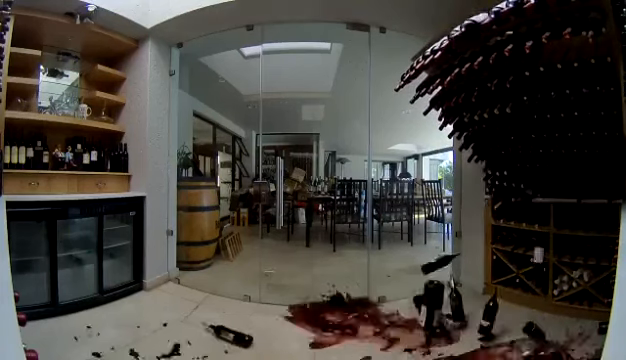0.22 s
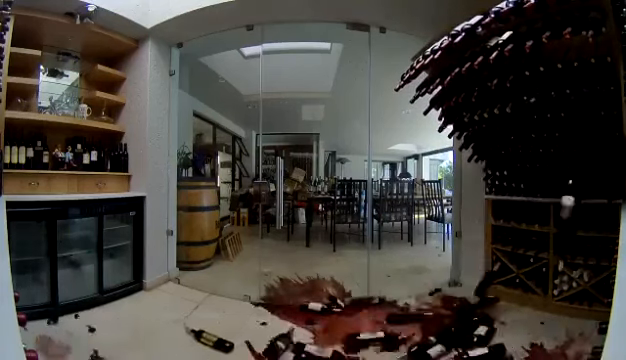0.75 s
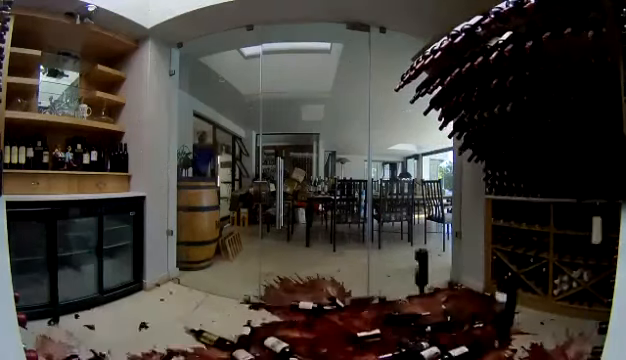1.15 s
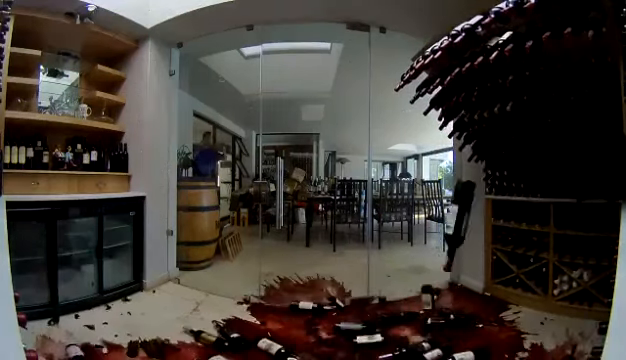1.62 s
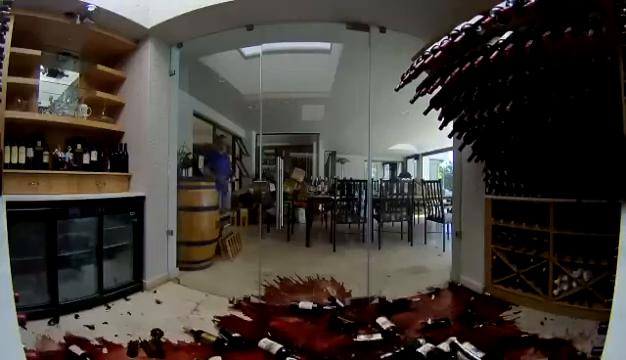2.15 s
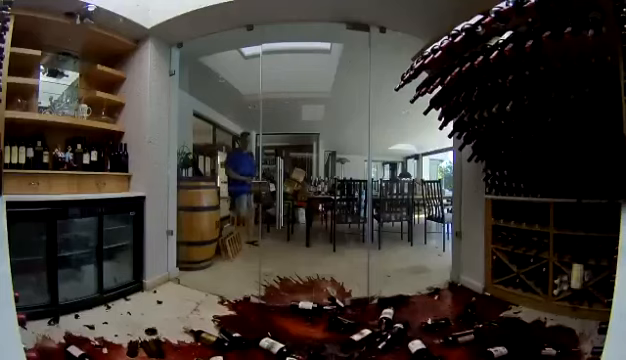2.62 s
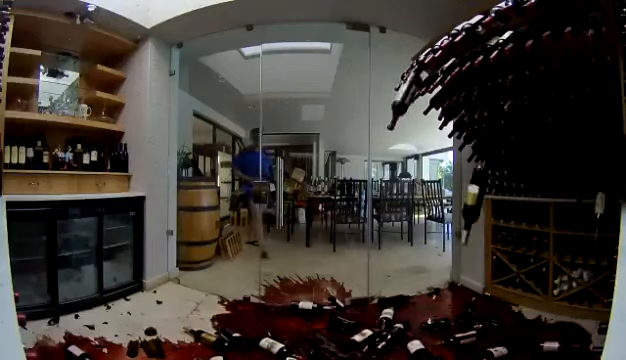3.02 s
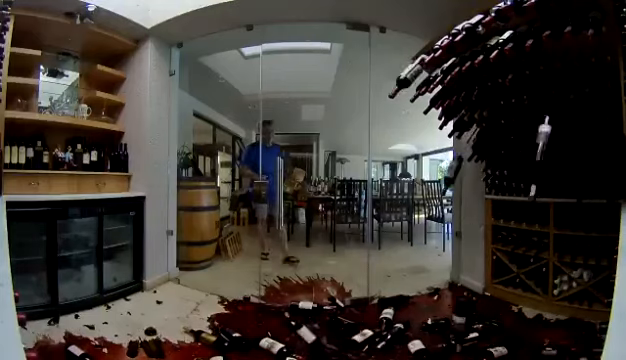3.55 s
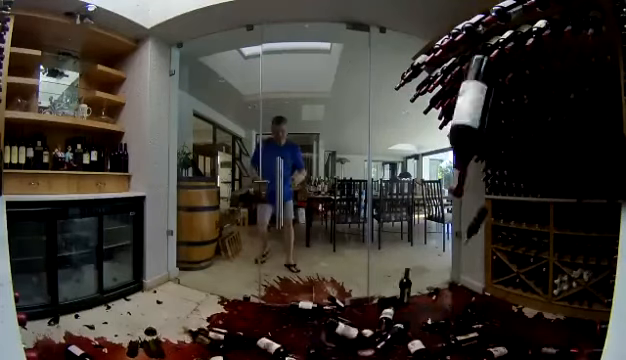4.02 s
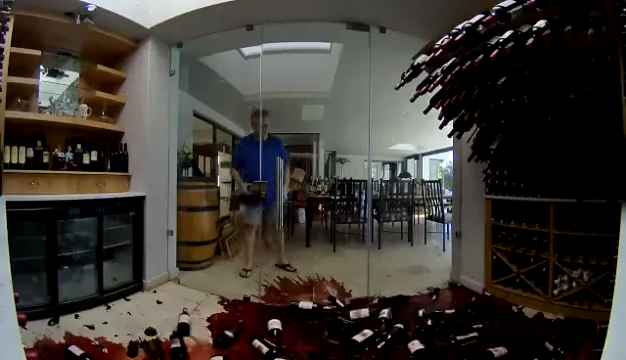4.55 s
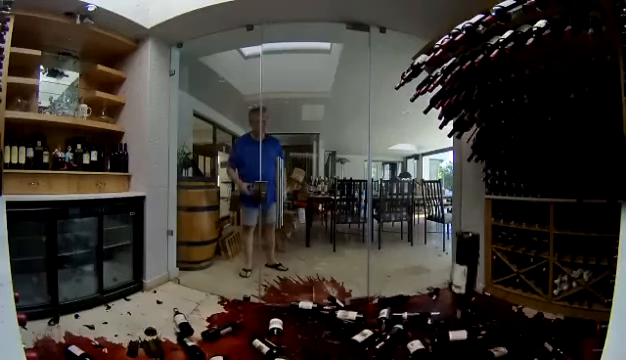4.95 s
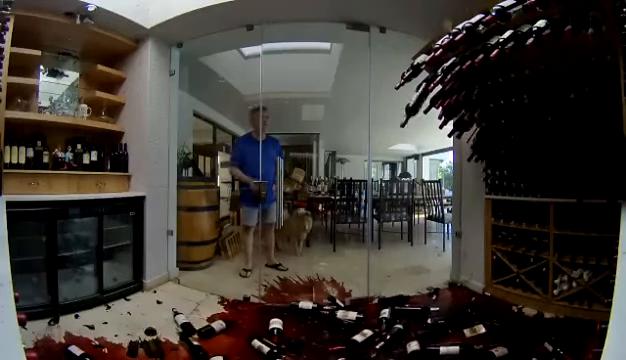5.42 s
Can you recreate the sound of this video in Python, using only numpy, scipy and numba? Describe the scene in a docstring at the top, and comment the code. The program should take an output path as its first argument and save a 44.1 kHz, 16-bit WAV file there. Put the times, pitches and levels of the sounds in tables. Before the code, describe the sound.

A hard-walled wine cellar with glass doors: full bottles fall from a rack and burst on the tile floor. Two big smashes open, a short lull follows, then overlapping bursts crash almost without pause, with wine slaps, ringing shards and faint floor thuds. Near the end the crash drops away and bright pieces rattle. Heard through one small microphone, mono, bright but cut off at the top.

```python
"""Wine bottles bursting in a cellar

Full wine bottles drop from a rack and burst on a tiled floor, one upon another, in a hard-walled cellar.
Wine, glass walls, shards and splinters are crowds of tiny struck modes with short echoes, the smaller the higher.
Larger pieces rattle as noise contacts in one resonance; filtered noise makes the floor's thuds and rumble.
A small microphone rounds the loudest peaks; a steep low-pass near 7 kHz ends the treble.
"""
import sys
import numpy as np
from scipy import signal
from scipy.fft import rfft, irfft
from scipy.io import wavfile
from numba import njit

SR = 44100
rng = np.random.default_rng(int(sys.argv[2]) if len(sys.argv) > 2 else 0)


def transcribe(signal):
    """Save signal, clipped to [-1, 1], as a 16-bit WAV file at the path in sys.argv[1]."""
    frames = np.atleast_2d(signal).T
    limited = np.clip(frames, -1, 1)
    pcm = np.round(limited * 32767).astype(np.int16)
    wavfile.write(sys.argv[1], SR, pcm)


N = 250488
T = np.arange(N) / SR  # time in seconds

# Bottles, or clusters of them, that burst on the tiles.
# Each row: start in seconds, level of the glass walls in dB, level of the wine in dB, hold in seconds.
BOTTLE_BURSTS = [(-0.02, -22, -33.5, 0.2), (0.184, -21.5, -30, .18), (0.692, -31, -36.5, .1),
                 (0.987, -29.5, -31.5, 0.068), (1.111, -26.5, -32, 0.066), (1.286, -24.5, -30, 0.14),
                 (1.532, -26, -29, 0.025), (1.596, -27, -36, 0.017), (1.673, -26.5, -30.5, 0.046),
                 (1.781, -27, -28.5, 0.056), (1.854, -26.5, -29, 0.051), (2.179, -22, -30, 0.14),
                 (2.389, -24.5, -32.5, 0.032), (2.515, -22, -37.5, 0.088), (2.804, -23.5, -28, 0.026),
                 (3.112, -22, -30, 0.023), (3.165, -24, -27, 0.028), (3.274, -24.5, -31.5, 0.075),
                 (3.434, -30, -35, .08), (3.621, -26.5, -34, .13), (3.845, -24.5, -29, 0.014),
                 (3.885, -26, -30.5, .03), (3.954, -27, -31, 0.027), (4.046, -22.5, -34, 0.042),
                 (4.124, -26, -33, 0.073), (4.275, -25, -31, .04), (4.398, -28, -36, 0.073),
                 (4.577, -28.5, -32, 0.024), (4.63, -27.5, -33.5, .05), (4.75, -31.5, -35.5, 0.043),
                 (4.942, -24, -30.5, 0.035), (5.164, -25.5, -32.5, 0.054), (5.571, -35, -47, 0.068)]


def undb(db):
    """Turns decibels into an amplitude factor."""
    return 10 ** (np.asarray(db) / 20)


def unit(x):
    """Scales a sound to an RMS of one."""
    return x / np.sqrt(np.mean(x ** 2))


def band(x, lo_hz, hi_hz):
    """Colours a sound as glass on tile and keeps one range of it, with soft edges."""
    # Glass on tile through the small microphone. Each row: frequency in Hz, level in dB per Hz.
    colour = [(65, -43.5), (110, -25), (150, -22.5), (329, -18), (399, -14.5), (458, -13.5), (500, -12.5),
              (1450, -12.5), (2710, -7), (3390, -9), (4720, -8), (5530, -2), (6460, 7), (7050, -1),
              (9160, -25), (15500, -120)]
    f = np.maximum(np.fft.rfftfreq(N, 1 / SR), 1)
    hz, db = np.transpose(colour)
    tilt = undb(np.interp(np.log(f), np.log(hz), db))
    edges = 1 / np.sqrt((1 + (lo_hz / f) ** 20) * (1 + (f / hi_hz) ** 20))
    return unit(irfft(rfft(x) * edges * tilt, N))


@njit
def ring(n, start, pole, size):
    """Each grain is one struck mode: a turning, shrinking phasor followed down to a thirtieth of its size."""
    y = np.zeros(n)
    for k in range(len(start)):
        z = size[k] + 0j
        i = start[k]
        while i < n and abs(z) > size[k] / 30:
            y[i] += z.imag
            z = z * pole[k]
            i = i + 1
    return y


def grains(per_s, lo_hz, hi_hz, t60_s, scatter_db, echoes=4):
    """Fragments struck at random moments, each with its own pitch, ring time, size and echoes."""
    cellar_t60_s, echo_db = .1, -1.5
    draws = rng.random((int(per_s * N / SR), 4 + echoes))
    when, pitch, long, big, *lags = draws.T
    hz = lo_hz + (hi_hz - lo_hz) * pitch
    ring_s = t60_s * 2 ** (2 * long - 1)  # from half to double the given time
    pole = np.exp(2j * np.pi * hz / SR - np.log(1000) / (ring_s * SR))
    # a long ring starts weaker, so the blow's energy sets the size
    size = undb(scatter_db * big ** 3) / np.sqrt(ring_s)
    # every fragment lies elsewhere, so tile, glass and plaster return it after lags of its own
    lag_s = np.array([0 * when] + lags) * cellar_t60_s / 3  # the first row is the direct sound
    gain = undb((lag_s > 0) * echo_db - 60 * lag_s / cellar_t60_s)
    start = (when * N + lag_s * SR).astype(np.int64)
    return ring(N, start.ravel(), np.tile(pole, echoes + 1), (gain * size).ravel())


def bursts(db, fade_db_per_s):
    """Power of all bursts: each rises quickly, holds and dies away."""
    step, attack_s = 64, 0.02  # step in samples
    t = T[::step]
    start, _, _, hold = np.array(BOTTLE_BURSTS).T[:, :, None]
    rise = np.clip((t - start) / attack_s, 0, 1)
    fade_db = fade_db_per_s * np.maximum(t - start - hold, 0)
    level = rise * undb(db[:, None] - fade_db)
    return np.interp(T, t, np.sum(level ** 2, axis=0))


def over_bed(burst_power, bed_db):
    """Adds the power of the bursts to that of the steady noise under them and gives the level in dB."""
    return 10 * np.log10(burst_power + undb(bed_db) ** 2)


def wine(wine_db):
    """Wine slaps the tiles: a crowd of very short, low modes."""
    slaps = grains(1500, 170.0, 873.0, .012, 2.8)
    return undb(wine_db) * band(slaps, 220., 698.0)


def glass(per_s, lo_hz, hi_hz, tick_t60_s, tinkle_per_s, tinkle_t60_s, tinkle_db):
    """A dense patter of short ticks under fewer fragments that ring on."""
    ticks = unit(grains(per_s, 0.803 * lo_hz, 1.1 * hi_hz, tick_t60_s, 6.7))
    tinkle = unit(grains(tinkle_per_s, .8 * lo_hz, 1.1 * hi_hz, tinkle_t60_s, 6., echoes=2))
    return band(ticks + undb(tinkle_db) * tinkle, lo_hz, hi_hz)


def walls(wall_db):
    """Bottle walls crack: the largest fragments, ringing lowest."""
    return undb(wall_db) * glass(2500, 695.0, 2310.0, 0.0079, 200, 0.32, -7.0)


def shards(shard_db):
    """Shards ring above the walls, with more tinkle."""
    return undb(shard_db) * glass(3000, 2480.0, 5160.0, .008, 250, 0.4, -4.0)


def splinters():
    """The finest splinters ring highest, at a level that follows its own course."""
    # How loud the splinters are. Each row: time in seconds, level in dB.
    splinter_levels = [(0.0, -11.5), (0.32, -14.5), (0.52, -25), (1.17, -13.5), (1.47, -17), (1.6, -14.5),
                       (2.53, -17.5), (2.59, -13), (2.86, -15), (3.08, -13), (3.27, -20.5), (3.35, -15),
                       (3.64, -20), (3.73, -12), (3.75, -16.5), (5.13, -18), (5.21, -14.5), (5.3, -21),
                       (5.44, -22.5), (5.46, -20.5), (5.54, -20), (5.55, -26), (5.66, -21.5), (5.68, -29)]
    splinter_db = np.interp(T, *np.transpose(splinter_levels))
    return undb(splinter_db) * glass(3000, 4850.0, 7580.0, .008, 250, 0.43, -3.0)


def boom(wine_db):
    """The floor booms with low struck modes whose level moves with the wine."""
    mean_db = -52.
    boom_db = mean_db + wine_db - wine_db.mean()
    return undb(boom_db) * band(grains(600, 90., 300., 0.023, 5.6), 134., 220.)


def rumble(wall_db):
    """Low-passed noise at the very bottom, swelling gently with the cracking walls."""
    top_hz, base_db, share = 66., -53.5, .3  # share of the walls' swing in dB
    low = signal.cheby1(6, 1, top_hz, fs=SR, output="sos")
    noise = unit(signal.sosfilt(low, rng.standard_normal(N)))
    swing_db = share * (wall_db - wall_db.mean())
    return undb(base_db + swing_db) * noise


def crash():
    """Wine and glass burst over a steady noise of both; the smaller the fragment, the higher it rings."""
    # Level of the steady glass noise under the bursts, with an early dip and slow return.
    # Each row: time in seconds, level in dB.
    bed_levels = [(0, -19), (.4, -31), (.56, -31), (.95, -26), (1.3, -24.5), (2.1, -25), (2.7, -25),
                  (2.8, -27), (2.95, -28.5), (3.08, -31), (3.3, -27), (3.57, -29.5), (3.75, -25),
                  (4.5, -26.5), (4.85, -30.5), (5.1, -26), (5.3, -26.5), (5.5, -44), (5.68, -37.5)]
    bed_db = np.interp(T, *np.transpose(bed_levels))
    _, glass_db, slap_db, _ = np.transpose(BOTTLE_BURSTS)
    wine_fade, wall_fade, shard_fade = 170, 128.5, 98  # dB per second
    # shards, and the wine's steady noise, stand in dB against the walls; wine bursts have their own levels
    wine_db = over_bed(bursts(slap_db, wine_fade), bed_db - 10.5)
    wall_db = over_bed(bursts(glass_db, wall_fade), bed_db)
    shard_db = over_bed(bursts(glass_db + 2, shard_fade), bed_db + 3.5)
    broken = walls(wall_db) + shards(shard_db) + splinters()
    return broken + wine(wine_db) + boom(wine_db) + rumble(wall_db)


def thuds():
    """A short low shudder of the floor under each heavy bottle: noise in a low band, swelling and fading."""
    # Heavy bottles that shake the floor.
    # Each row: time in seconds (a third of the way into the shudder), peak level in dB, pitch in Hz.
    heavy_bottles = [(0.148, -44, 50.5), (0.391, -37, 57.6), (1.809, -46, 50), (2.195, -45, 51.7),
                     (2.287, -38.5, 83.4), (2.597, -38, 95.5), (2.771, -46, 53.8), (3.496, -49, 51.1),
                     (3.649, -50, 50.3), (4.619, -35, 91.5)]
    length_s = .09
    out = np.zeros(N)
    shake = rng.standard_normal(N)
    for s, db, hz in heavy_bottles:
        progress = np.clip((T - s) / length_s + 0.33, 0, 1)
        floor = signal.butter(2, [hz / 1.35, hz * 1.35], "bandpass", fs=SR, output="sos")
        shudder = np.sin(np.pi * progress) ** 2 * signal.sosfilt(floor, shake)
        out += undb(db) * shudder / np.abs(shudder).max()
    return out


def swell(start, length, soft):
    """Rises, holds and falls over the given length, all in seconds."""
    nearest_end = np.minimum(T - start, start + length - T)
    return np.clip(nearest_end / soft, 0, 1)


def pieces():
    """Each piece chatters on the floor: quick uneven contacts into one resonance."""
    # Larger pieces that rattle on the tiles.
    # Each row: start in seconds, length in seconds, pitch in Hz, width of the resonance in Hz, RMS level in dB.
    large_pieces = [(0.4, 0.047, 4200, 60, -34), (0.425, 0.11, 2130, 110, -34),
                    (1.153, 0.058, 5900, 110, -19.5), (1.318, 0.071, 5000, 60, -24.5),
                    (1.85, 0.064, 4220, 50, -24), (1.93, 0.049, 6860, 50, -25), (2.8, 0.18, 2380, 110, -26),
                    (3.286, 0.055, 4120, 100, -29), (3.296, 0.04, 4520, 60, -27),
                    (3.355, 0.038, 1840, 60, -27), (3.38, 0.06, 4600, 80, -30.5),
                    (3.42, 0.18, 2703, 100, -24), (3.463, 0.05, 2960, 50, -30), (3.9, 0.076, 4320, 80, -27),
                    (4.014, 0.044, 4370, 80, -24), (4.248, 0.08, 4460, 80, -25),
                    (4.291, 0.042, 2030, 60, -25), (4.299, 0.089, 2745, 130, -22.5),
                    (4.386, 0.064, 4550, 100, -26), (4.521, 0.027, 1200, 60, -31),
                    (4.562, 0.08, 4990, 140, -23.5), (4.64, 0.036, 2260, 50, -31),
                    (4.63, 0.028, 4050, 60, -31), (4.706, 0.071, 4090, 60, -35),
                    (4.744, 0.083, 2206, 60, -30.5), (5.02, 0.062, 4470, 60, -29),
                    (5.208, 0.1, 1630, 60, -30.5), (5.213, 0.063, 3130, 60, -26),
                    (5.318, 0.13, 5070, 300, -25), (5.325, 0.064, 5400, 600, -18),
                    (5.372, 0.089, 5430, 600, -13.5), (5.462, 0.053, 5450, 500, -28),
                    (5.462, 0.095, 6520, 450, -17.5), (5.6, 0.066, 2880, 60, -37),
                    (5.604, 0.084, 5500, 500, -20)]
    out = np.zeros(N)
    struck = rng.random(N) < 1600 / SR  # about 1600 hard contacts a second
    contacts = rng.standard_normal(N) * (0.077 + struck)  # over a faint scrape
    for s, length, hz, width, db in large_pieces:
        mode = signal.butter(2, [hz - width / 2, hz + width / 2], "bandpass", fs=SR, output="sos")
        shape = swell(s, length, .025)
        rattle = shape * signal.sosfilt(mode, contacts)
        heard = shape > 0
        out[heard] += undb(db) * unit(rattle[heard])
    return out


def scene():
    """The crash, the floor's thuds and the rattling pieces, in one channel."""
    return (crash() + thuds() + pieces())[None]


def record(dry):
    """The small microphone rounds only the loudest peaks and sits off zero; a steep low-pass ends the treble."""
    ceiling, offset, top_hz = .6, -0.021, 7000  # ceiling and offset as parts of full scale
    rounded = dry / (1 + (dry / ceiling) ** 10) ** (1 / 10)
    low_pass = signal.ellip(14, .3, 95, top_hz, fs=SR, output="sos")
    return signal.sosfilt(low_pass, rounded + offset)


dry = scene()
out = record(dry)
transcribe(out)
```